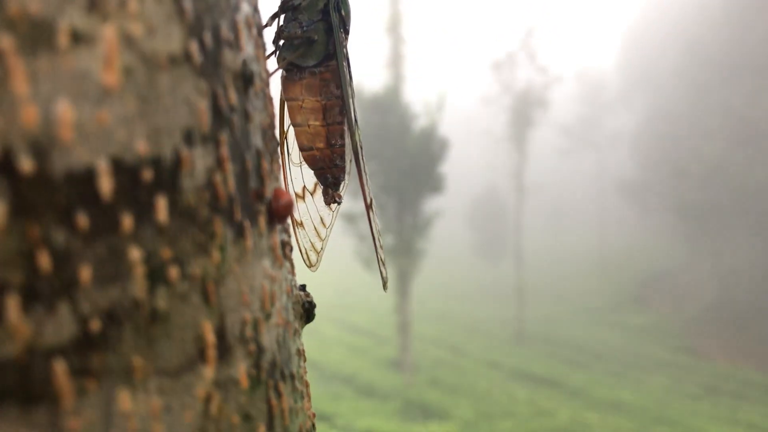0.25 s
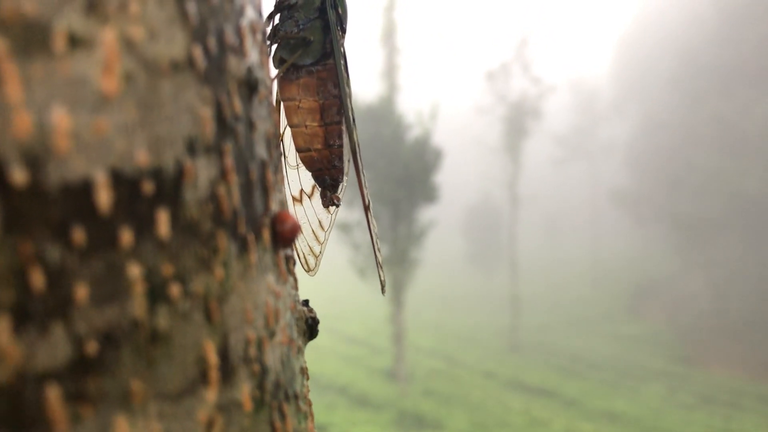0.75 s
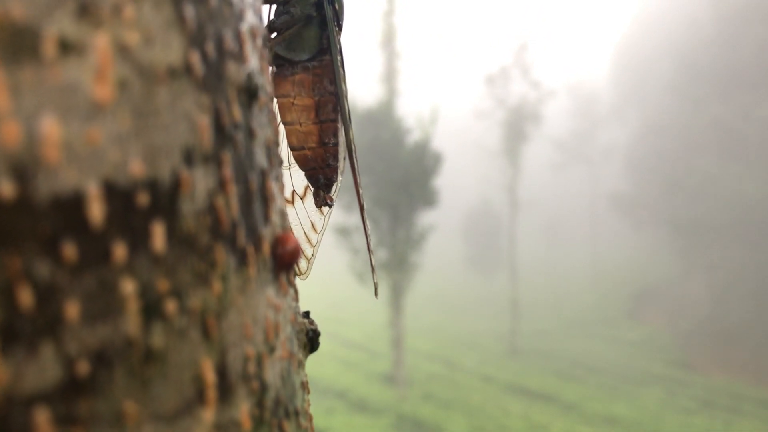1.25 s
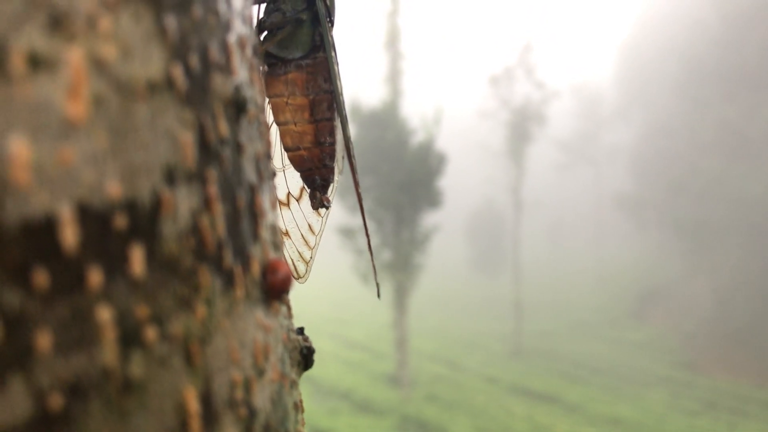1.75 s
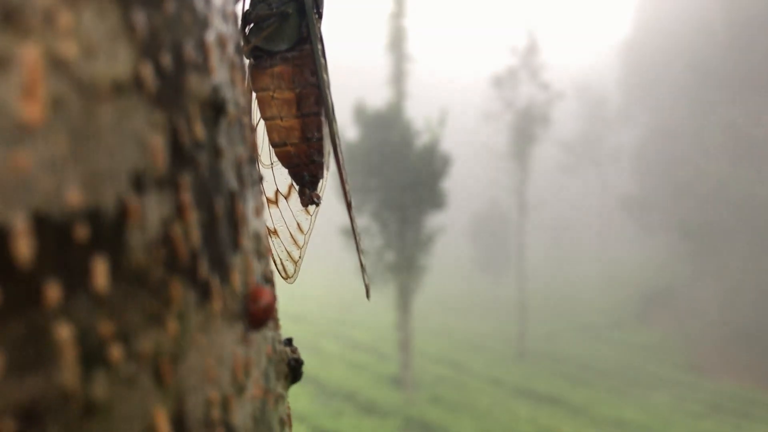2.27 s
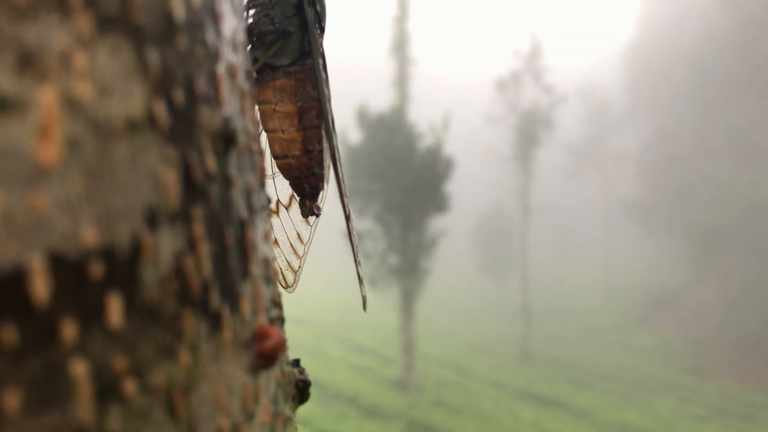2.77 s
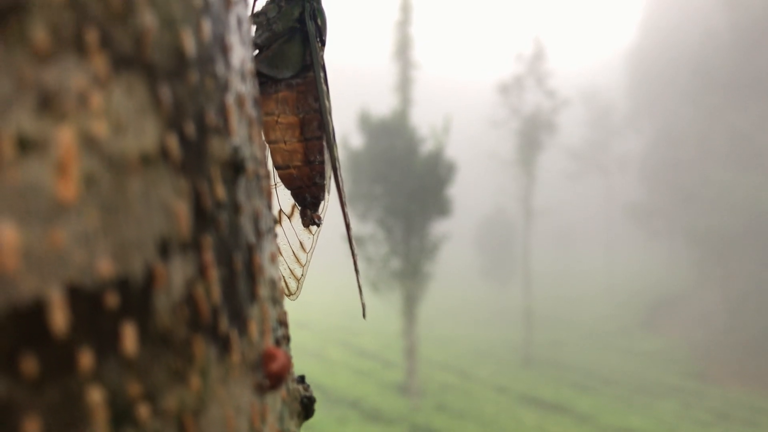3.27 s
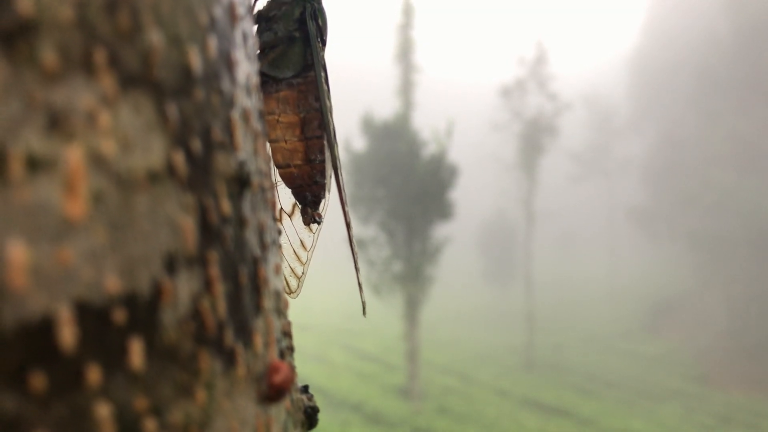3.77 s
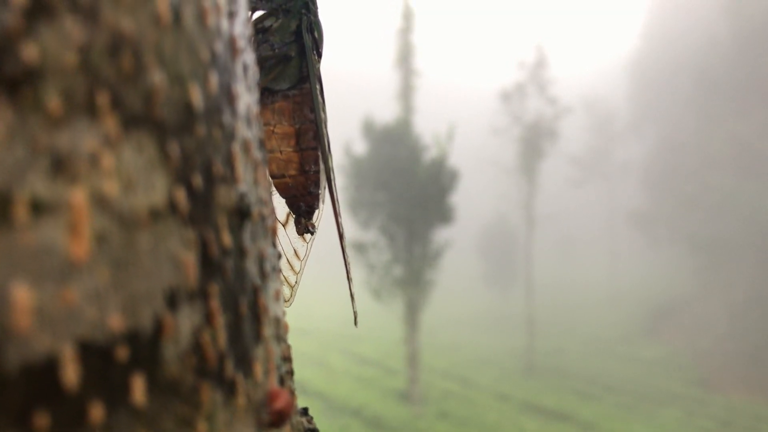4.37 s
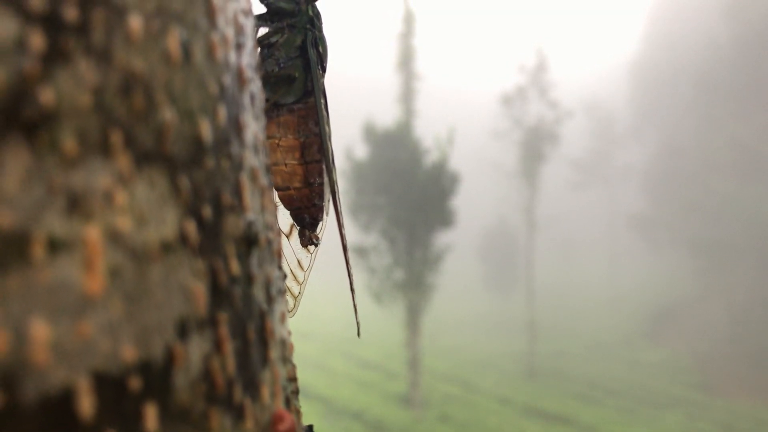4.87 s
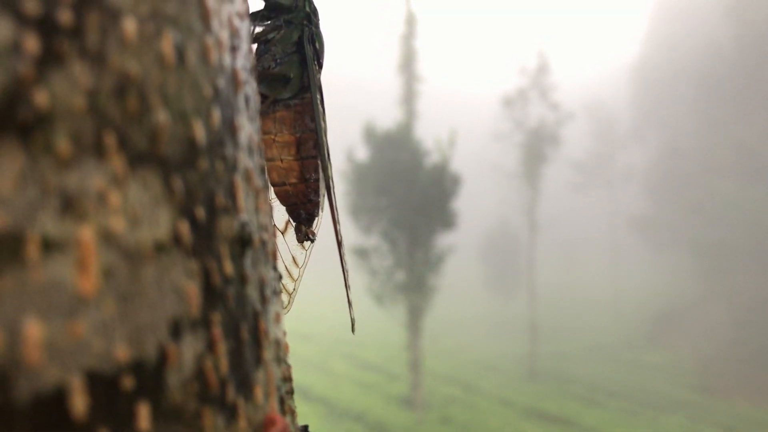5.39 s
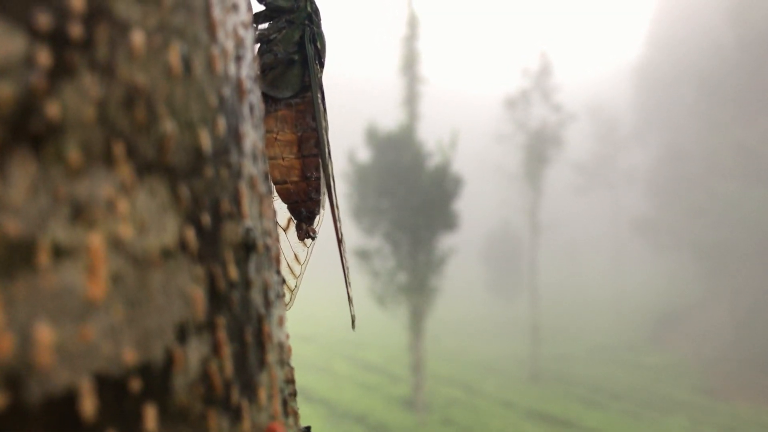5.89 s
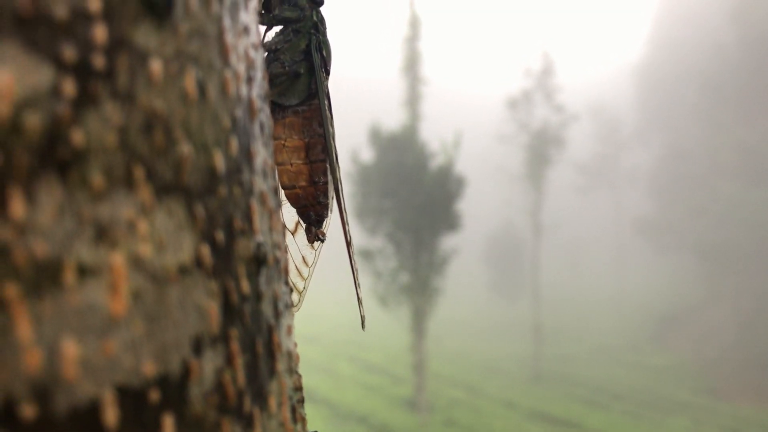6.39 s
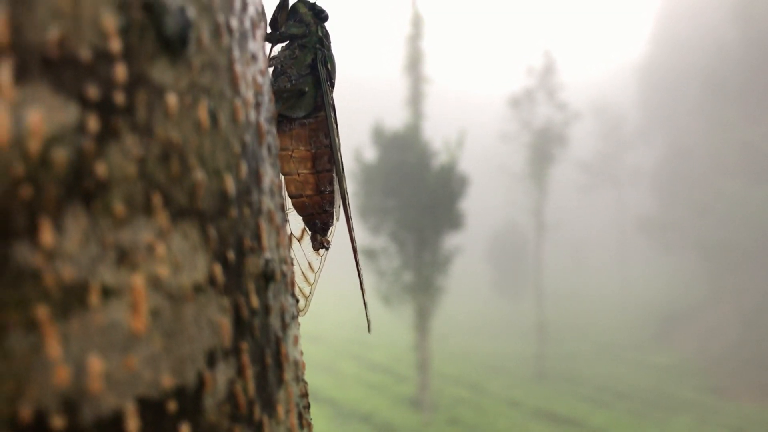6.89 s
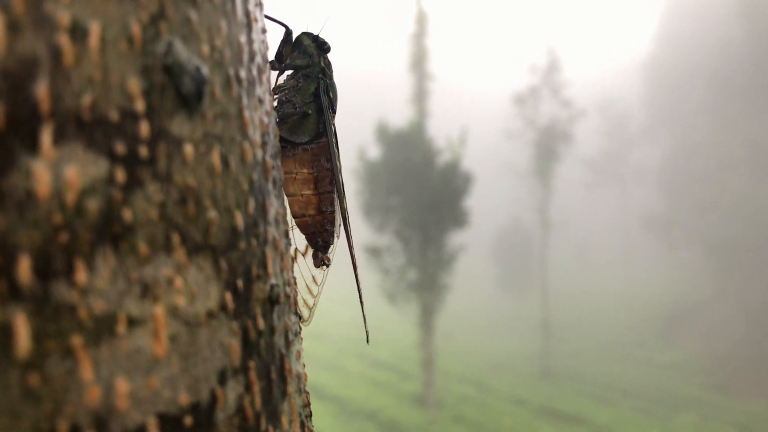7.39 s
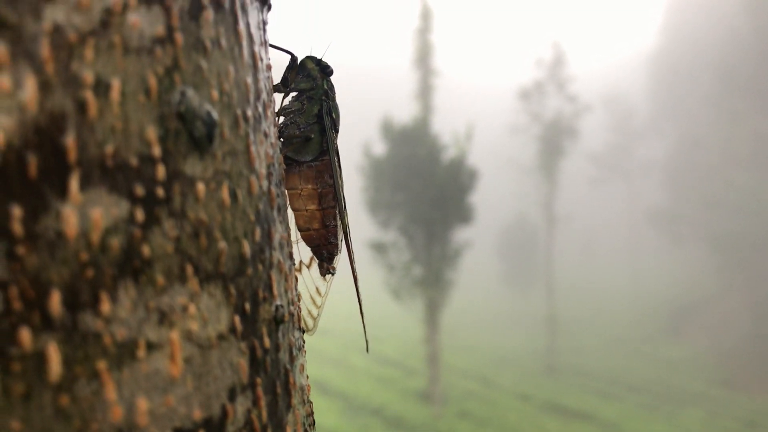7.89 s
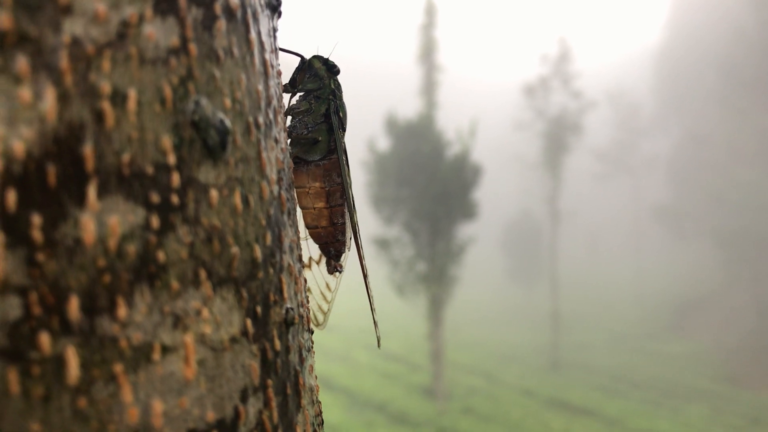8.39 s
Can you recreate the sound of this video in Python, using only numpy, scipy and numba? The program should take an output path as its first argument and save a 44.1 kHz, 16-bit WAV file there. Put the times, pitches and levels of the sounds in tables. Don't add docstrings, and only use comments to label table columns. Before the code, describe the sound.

A single cicada on a trunk sings very close to the microphone on an open misty hillside. Harsh clicking bursts pulse about thirteen times a second, speed up after six seconds, fuse into a clearer ringing whine near seven and a half, then cut off. Sparse ticking pairs restart and thicken. Low wind thumps buffet the microphone; faint insects and bird whistles lie far behind.

```python
import sys
import numpy as np
from scipy import signal
from scipy.io import wavfile
from scipy.ndimage import uniform_filter1d
from numba import njit

SR = 44100
rng = np.random.default_rng(int(sys.argv[2]) if len(sys.argv) > 2 else 0)


def decibels_to_gain(level_db):
    exponent = np.asarray(level_db, float) / 20
    return 10 ** exponent


def wav_out(sig):
    wavfile.write(sys.argv[1], SR, np.round(np.clip(np.atleast_2d(sig).T, -1, 1) * 32767).astype(np.int16))


N = 381465
T_S = np.arange(N) / SR
LOCK_T60_MS = 8.2
LOCK_FROM_S = 7
BURST_GAP_S = .008


def unit(x):
    return x / np.sqrt(np.mean(x ** 2) + 1e-20)


def in_time(rows):
    s, *columns = np.transpose(rows)
    return [np.interp(T_S, s, c) for c in columns]


def filtered(x, order, hz, kind="low"):
    return signal.sosfilt(signal.butter(order, hz, kind, fs=SR, output="sos"), x)


def band(low_hz, high_hz, order=2):
    return unit(filtered(rng.standard_normal(N + SR), order, [low_hz, high_hz], "band")[SR:])


def clicks(seconds, db):
    at = np.round(seconds * SR).astype(int).ravel()
    return np.bincount(at, decibels_to_gain(db).ravel(), N + SR)[:N]


@njit
def resonate(x, feed, r, w):
    out = np.zeros(len(x))
    for i in range(2, len(x)):
        out[i] = feed[i] * x[i - 1] + 2 * r[i] * np.cos(w[i]) * out[i - 1] - r[i] ** 2 * out[i - 2]
    return out


def ring(x, hz, t60_ms):
    w = 2 * np.pi * hz / SR + np.zeros(N)
    r = decibels_to_gain(-60000 / (t60_ms * SR)) + np.zeros(N)
    return resonate(x + 1e-18, np.sin(w), r, w)


def sweep(x, from_hz, to_hz, ms):
    t = np.arange(int(ms * SR / 1000)) / SR
    chirp = np.hanning(len(t)) * signal.chirp(t, from_hz, ms / 1000, to_hz)
    return np.convolve(x, chirp)[:N]


def buckle_times():
    # (start [s], buckles [count], first gap
    # [ms], settled gap [ms], last gap [ms])
    even_song = [(0.0044, 1, 0.0, 0.0, 0.0), (0.0195, 8, 8.5, 4.7, 5.6), (0.093, 10, 8.6, 4.4, 6.9),
                 (0.1673, 11, 8.1, 4.5, 4.2), (0.2479, 12, 7.93, 4.67, 6.1), (0.3277, 6, 9.0, 7.2, 10.3),
                 (0.3787, 9, 10.5, 8.1, 10.4), (0.4732, 6, 8.3, 6.3, 11.8), (0.5388, 8, 8.5, 4.8, 5.7),
                 (0.6136, 9, 8.6, 4.5, 4.6), (0.69, 9, 8.2, 4.5, 3.9), (0.7647, 11, 8.2, 4.5, 4.7),
                 (0.8425, 4, 8.9, 5.1, 8.7), (0.8737, 8, 11.1, 9.2, 10.5), (0.9505, 5, 12.2, 8.7, 9.2),
                 (1.0188, 5, 9.0, 5.1, 6.3), (1.0841, 7, 9.1, 5.9, 7.9), (1.1608, 9, 8.7, 4.7, 8.8),
                 (1.238, 9, 8.6, 4.6, 5.0), (1.3157, 9, 9.0, 4.8, 4.7), (1.3933, 10, 8.1, 6.0, 12.6),
                 (1.478, 4, 9.7, 4.7, 9.1), (1.5105, 5, 11.8, 7.5, 7.3), (1.5756, 6, 8.7, 5.5, 9.6),
                 (1.647, 7, 9.5, 5.0, 4.6), (1.7254, 8, 8.5, 5.2, 6.8), (1.804, 8, 8.9, 5.2, 6.5),
                 (1.8836, 8, 8.9, 6.1, 9.4), (1.9547, 8, 10.4, 8.9, 12.9),
                 (2.0463, 7, 9.2, 6.7, 9.4), (2.1252, 7, 9.1, 4.7, 4.8), (2.1984, 9, 8.8, 4.8, 5.2),
              (2.2789, 8, 8.9, 5.3, 7.8), (2.3567, 8, 8.9, 6.9, 12.9), (2.4414, 7, 9.6, 5.6, 8.6),
              (2.5197, 7, 9.1, 4.8, 4.7), (2.5934, 8, 8.7, 5.4, 9.0), (2.6731, 7, 9.0, 6.1, 7.4),
              (2.7505, 7, 9.4, 6.1, 5.1), (2.829, 4, 9.1, 4.5, 8.3), (2.8594, 4, 11.7, 7.8, 11.3),
              (2.9105, 3, 10.1, 0.0, 6.3), (2.9348, 4, 6.1, 21.0, 9.7), (2.9942, 6, 9.2, 5.8, 11.0),
              (3.0689, 7, 9.1, 6.0, 6.6), (3.1462, 7, 9.1, 5.4, 5.1), (3.2255, 7, 9.2, 5.3, 5.6),
              (3.3041, 7, 9.0, 6.3, 6.7), (3.3848, 4, 9.4, 3.8, 7.9), (3.4145, 4, 10.7, 13.6, 11.7),
              (3.4737, 6, 10.4, 6.2, 9.4), (3.5527, 6, 9.2, 5.7, 8.6), (3.6301, 6, 9.1, 5.7, 8.9),
              (3.7075, 7, 9.3, 6.1, 7.1), (3.7875, 7, 8.2, 5.7, 7.2), (3.8623, 6, 9.0, 6.2, 11.1),
              (3.939, 6, 9.7, 6.2, 10.4),
                 (4.0224, 6, 9.4, 5.5, 8.4), (4.0986, 7, 9.3, 5.0, 4.4), (4.1724, 8, 8.5, 4.8, 5.7),
              (4.2488, 7, 9.1, 5.5, 5.2), (4.3214, 6, 9.0, 10.5, 13.5), (4.3855, 5, 11.4, 12.3, 12.4),
              (4.4654, 5, 9.0, 5.0, 5.9), (4.5373, 7, 8.9, 4.7, 5.3), (4.6119, 8, 8.2, 4.6, 6.0),
              (4.694, 6, 7.7, 5.4, 4.8), (4.77, 6, 9.3, 6.1, 6.9), (4.8255, 1, 0.0, 0.0, 0.0),
              (4.8426, 7, 12.6, 6.9, 12.1), (4.9401, 6, 8.6, 5.5, 10.7), (5.0144, 7, 8.2, 4.7, 6.2),
              (5.0948, 7, 8.4, 5.1, 9.8), (5.1742, 7, 8.6, 6.3, 13.3), (5.2549, 7, 8.9, 5.1, 7.0),
              (5.3336, 7, 7.8, 4.9, 10.1), (5.413, 7, 8.0, 5.6, 9.2), (5.4933, 7, 8.7, 5.4, 8.6),
              (5.5695, 7, 7.5, 4.9, 7.9), (5.6461, 8, 8.7, 5.1, 8.2), (5.7292, 7, 7.8, 4.7, 7.4),
              (5.8017, 8, 7.2, 5.3, 13.5), (5.8668, 5, 9.3, 6.6, 5.9), (5.9042, 4, 7.8, 12.8, 11.3),
              (5.9664, 7, 7.3, 5.2, 8.5)]
    quickening = [(6.0374, 9, 7.1, 4.2, 5.8), (6.1104, 9, 6.6, 4.2, 5.2), (6.1852, 10, 7.9, 4.2, 6.5),
                  (6.2575, 10, 7.6, 4.2, 5.6), (6.3325, 10, 7.2, 4.1, 7.5), (6.4071, 5, 8.0, 5.5, 4.3),
                  (6.4371, 5, 4.1, 7.9, 8.9), (6.4806, 10, 10.3, 4.5, 8.5), (6.5676, 10, 6.4, 4.1, 8.8),
                  (6.6398, 13, 7.54, 4.0, 5.5), (6.7209, 13, 6.29, 3.83, 4.3),
                  (6.7966, 14, 5.69, 3.71, 5.3), (6.8784, 15, 5.37, 3.81, 5.5),
                  (6.9578, 16, 4.82, 3.72, 4.6), (7.0361, 17, 5.0, 3.74, 7.3),
                  (7.1154, 15, 4.54, 3.68, 5.5), (7.1906, 14, 4.54, 3.68, 4.6),
                  (7.2596, 13, 4.37, 3.7, 6.3), (7.3266, 11, 4.4, 3.8, 5.6), (7.3901, 8, 4.6, 3.8, 5.3),
                  (7.4482, 8, 4.7, 3.8, 4.8), (7.505, 8, 4.3, 4.0, 4.2), (7.5627, 35, 4.22, 3.97, 4.0)]
    restart = [(7.7544, 2, 0.0, 0.0, 10.16), (7.785, 2, 0.0, 0.0, 8.62), (7.8109, 4, 10.1, 17.7, 9.8),
               (7.863, 2, 0.0, 0.0, 10.32), (7.8881, 2, 0.0, 0.0, 11.45), (7.9185, 2, 0.0, 0.0, 11.93),
               (7.9475, 6, 12.5, 12.0, 11.0), (8.079, 5, 5.4, 14.0, 12.0), (8.1958, 4, 10.6, 17.4, 11.6),
               (8.3052, 2, 0.0, 0.0, 12.27), (8.38, 4, 9.7, 12.8, 11.9), (8.4711, 4, 10.3, 13.3, 11.1),
               (8.5517, 6, 7.0, 4.2, 5.7), (8.6374, 3, 5.6, 0.0, 5.4)]
    # (time [s], limp [ms])
    gait = [(0, .6), (.8, .8), (1.1, 1), (3, 1.5), (4.5, 1.2), (4.75, .2), (6, .2), (6.6, .3), (6.82, .3),
            (6.9, -.45), (7.2, -.45), (7.5, -.3), (7.56, .19), (7.7, .19), (7.75, .3)]
    gait_s, limp_ms = np.transpose(gait)
    times = []
    for start, count, first, settled, last in [*even_song, *quickening, *restart]:
        k = np.arange(int(count) - 1)
        gaps_ms = settled + (first - settled) * .5 ** k
        gaps_ms += np.interp(start, gait_s, limp_ms) * (-1.) ** k * (k > 0)
        gaps_ms[-1:] = last
        times.append(start + np.r_[0, np.cumsum(gaps_ms)] / 1000)
    return np.concatenate(times)


def lock_to_abdomen(at, belly_hz, belly_ms):
    cycles = np.cumsum(belly_hz) / SR
    locked = (np.interp(at, T_S, belly_ms) > LOCK_T60_MS) & (at > LOCK_FROM_S)
    free = np.interp(at, T_S, cycles)
    beat = free.copy()
    for k in np.flatnonzero(locked[1:] & (np.diff(at) < BURST_GAP_S)) + 1:
        beat[k] = beat[k - 1] + np.round(free[k] - beat[k - 1])
    return np.interp(beat, cycles, T_S), locked


def crowding(at, swell):
    hurry_ms, rush_ms, swell_eases = 5.5, 4.4, 0.55
    gap_ms = 1000 * (at - np.r_[-1, -1, -1, at[:-3]]) / 3
    hurry = np.interp(T_S, at, np.clip((hurry_ms - gap_ms) / (hurry_ms - rush_ms), 0, 1))
    return hurry * (1 - np.clip(swell_eases * swell, 0, 1))


def weak_side(at, locked):
    uneven_from_s, uneven_to_s, uneven_share = 6.95, 7.72, .6
    nth = np.arange(len(at))
    nth = nth - np.maximum.accumulate(nth * (np.diff(at, prepend=-1) > BURST_GAP_S))
    uneven = ~locked & (at > uneven_from_s) & (at < uneven_to_s)
    return (locked * (nth % 2) + uneven_share * uneven * (1 - nth % 2))[:, None]


def abdomen(push, both, belly_hz, belly_ms, swell, hurry, ringing, since_ms):
    snap_hz, snap_ms = 996, 0.55
    sag_hz = snap_hz * np.exp(-since_ms / snap_ms) * np.clip(3 - 2 * belly_ms / LOCK_T60_MS, 0, 1)
    out = decibels_to_gain(-1.5 * ringing) * ring(both, belly_hz + sag_hz, belly_ms + 2.2 * hurry)
    sac_db = -34.5 + 40 * np.minimum(swell + 0.41 * hurry, 1)
    out -= decibels_to_gain(sac_db) * ring(push, 1563, 7.9)
    wing_db = -2.5 + 12 * hurry
    out -= decibels_to_gain(wing_db) * ring(both, belly_hz + 655, 6)
    flank_db = -13
    return out + decibels_to_gain(flank_db) * ringing * ring(push, belly_hz, 2.9)


def tymbal(push, belly_hz, swell, flare, hurry, since_ms):
    snap_hz, snap_ms, t60_ms = 900, 1, 2.45
    lift_hz = belly_hz - 2214
    hz = 4140 + 0.052 * lift_hz - 300 * flare - 300 * hurry + snap_hz * np.exp(-since_ms / snap_ms)
    db = -1 - 5 * swell + 13 * lift_hz / 1000 + 2.5 * flare - 4.5 * hurry
    return decibels_to_gain(db) * ring(push, hz, t60_ms)


def strained_ribs(start, strength, chance, flare, slump):
    sweep_db, catch_ms, catch_db, slump_db = 11, .45, -3, -11.5
    catch_s = start + catch_ms / 1000 * (1 + .15 * np.abs(chance[:, 1:2]))
    catch = clicks(catch_s, strength + sweep_db + catch_db + .8 * chance[:, 2:3])
    out = sweep(flare * (clicks(start, strength + sweep_db) + catch), 2620, 6730, 3.4)
    return out + sweep(slump * clicks(start, strength + slump_db), 5000, 1660, 1.8)


def shell(crack, rattle, swell, flare, ringing):
    # (frequency [Hz], buckling level [dB], spring-back level [dB], t60 [ms], finale change [dB])
    shell_modes = [
        (4950, -11.5, -4, 2.3, 2.5),
        (5900, -10.5, -12.5, 4.1, 10),
        (7273, -15, -7.5, 3.95, 0.5),
        (8430, -45, -22.5, 5.4, -6),
        (9930, -26, -16, 2.9, 11.5),
        (11080, -12.5, -10.5, 2.9, -18),
        (13020, -6, -12.5, 1.02, -7),
        (14300, -9, -29, 2.7, 2),
        (15400, -7, -28, 3.3, -2),
    ]
    shell_db = -4 * swell + 1.5 * flare
    out = np.zeros(N)
    for k, (hz, in_db, out_db, t60_ms, finale_db) in enumerate(shell_modes):
        level_db = shell_db + finale_db * np.maximum(ringing, flare)
        out += (-1) ** k * decibels_to_gain(level_db) * ring(decibels_to_gain(in_db) * crack + decibels_to_gain(out_db) * rattle, hz, t60_ms)
    return out


def cicada():
    # (time [s], effort [dB], abdomen [Hz], abdomen t60 [ms], air-sac swelling [0-1])
    posture = [(0, -14, 2400, 7.4, 0.69), (1, -14, 2350, 7.95, 0.64), (2.5, -14.5, 2306, 7.4, 0.58),
               (4, -15, 2304, 7.3, 0.66), (6, -15.5, 2287, 6.4, 0.66), (6.5, -15, 2296, 4.8, 0.71),
               (6.85, -15, 2340, 4, 0.74), (7.05, -13.5, 2430, 5.4, 0.92), (7.25, -13, 2434, 7.1, 0.92),
               (7.38, -13, 2490, 8.8, 0.77), (7.46, -14.5, 2598, 13.2, 0.84), (7.56, -14, 2640, 13, 0.66),
               (7.63, -19, 2667, 14, 0.66), (7.71, -20, 2716, 6.5, 0.57), (7.74, -24, 2330, 6.1, 0.43),
               (8.02, -21, 2330, 6.5, 0.5), (8.2, -16.5, 2346, 6.2, 0.76), (8.65, -16, 2352, 7.6, 0.7)]
    # (time [s], share [0-1])
    strain = [
        (0, 0.094),
        (7.5, 0.057),
        (7.632, 0.13),
        (7.652, 0.91),
        (7.71, 0.74),
        (7.735, 0.027),
        (9, 0.047),
    ]
    # (push on abdomen [dB], push on tymbal [dB], crack on shell [dB])
    ribs = np.array([
        (-5, -1, 4),
        (2.5, 8.5, 6),
        (0.8, 11, -1),
        (-4, 7.5, -5),
        (-13, 1.5, -2),
    ])
    # (delay after first rib [ms], abdomen [dB], shell [dB])
    back = np.array([
        (2.448, -7, 3),
        (2.898, -14, -8),
        (3.302, -16, 2.5),
    ])
    effort_db, belly_hz, belly_ms, swell = in_time(posture)
    flare, = in_time(strain)
    at, locked = lock_to_abdomen(buckle_times(), belly_hz, belly_ms)
    hurry = crowding(at, swell)
    weak = weak_side(at, locked)
    since_ms = 1000 * np.abs(T_S - at[np.maximum(np.searchsorted(at, T_S) - 1, 0)])
    ringing = np.clip(belly_ms / LOCK_T60_MS - 1, 0, 1) * (T_S > LOCK_FROM_S)

    start, in_lock = at[:, None], locked[:, None]
    here = np.minimum(start * SR, N - 1).astype(int)
    chance = rng.standard_normal((len(start), 18))
    luck = chance * np.minimum(7 / belly_ms[here], 1) ** 2
    strength = effort_db[here] + 0.23 * luck[:, :1] - 3.5 * weak

    rib = np.arange(len(ribs))
    haste, slowing = 0.13, 0.037
    rib_periods = rib + slowing * rib ** 2 - haste * rib
    rib_s = start + rib_periods / belly_hz[here] + 8e-6 * luck[:, 1:6]
    rib_db = strength + 1.55 * luck[:, 6:11]
    back_s = start + (back[:, 0] + 0.12 * luck[:, 11:12] + 0.03 * luck[:, 12:15]) / 1000
    back_db = strength + 2.5 * luck[:, 15:18]

    push_s = np.where(in_lock, start + rib / belly_hz[here], rib_s)
    in_step_s = start + np.round((back_s - start) * belly_hz[here] - .5) / belly_hz[here]
    release_s = np.where(in_lock, in_step_s, back_s)
    push = clicks(push_s, rib_db + ribs[:, 0])
    both = push + clicks(release_s, back_db + back[:, 1] + 3 * in_lock)
    plate_lag_ms = .35
    plate_push = clicks(rib_s + plate_lag_ms / 1000, rib_db + ribs[:, 1])
    crack = clicks(rib_s, rib_db + ribs[:, 2])
    rattle = clicks(back_s, back_db + back[:, 2])

    out = abdomen(push, both, belly_hz, belly_ms, swell, hurry, ringing, since_ms)
    out -= tymbal(plate_push, belly_hz, swell, flare, hurry, since_ms)
    out += strained_ribs(start, strength, chance, flare, hurry * (belly_ms < LOCK_T60_MS))
    out += shell(crack, rattle, swell, flare, ringing)
    notch_hz, notch_width_hz, notch_depth = 10400, 800, .7
    out -= notch_depth * signal.lfilter(*signal.iirpeak(notch_hz, notch_hz / notch_width_hz, fs=SR), out)
    return filtered(out, 6, 1060, "high")


def hillside(x):
    scatter_db, t60_s, first_return_s = -41, 0.0041, .004
    t = np.arange(SR // 5) / SR
    tail = rng.standard_normal(len(t)) * decibels_to_gain(-60 * t / t60_s) * (t > first_return_s)
    tail = signal.lfilter([1], [1, -.5], tail)
    return decibels_to_gain(scatter_db) * signal.fftconvolve(x, tail / np.sqrt(np.sum(tail ** 2)))[:N]


def slaps():
    # (time [s], peak [dB], frequency [Hz])
    slap_events = [
        (1.612, -26, 190),
        (2.307, -13, 110),
        (3.269, -14, 166),
        (4.023, -19, 110),
        (6.453, -16, 163),
        (7.4, -13.5, 154),
        (8.503, -2, 119),
    ]
    rise_ms, slap_db, cut_hz = 6.1, -8, 450
    out, t = np.zeros(N), np.arange(SR // 8) / SR
    swing = 1000 * t / rise_ms * np.exp(1 - 1000 * t / rise_ms)
    for s, db, hz in slap_events:
        out[int(s * SR):][:len(t)] += decibels_to_gain(db + slap_db) * swing * np.sin(2 * np.pi * hz * t)
    return filtered(out, 2, cut_hz)


def far_insects():
    # (centre [Hz], width [Hz], level [dB])
    chorus = [
        (2590, 760, -56),
        (4300, 460, -55.5),
        (3180, 6300, -55),
        (12200, 510, -79),
    ]
    # (time [s], level [dB])
    whistler = [
        (8.0, -65),
        (8.16, -43),
        (8.3, -39.5),
        (8.6, -50),
    ]
    whistle_hz = 5520
    out = sum(decibels_to_gain(db) * band(hz - width / 2, hz + width / 2) for hz, width, db in chorus)
    silent_before, silent_after = (whistler[0][0] - .03, -90), (whistler[-1][0] + .03, -90)
    level_db, = in_time([silent_before, *whistler, silent_after])
    octave = band(2 * whistle_hz - 120, 2 * whistle_hz + 120)
    whistle = band(whistle_hz - 35, whistle_hz + 35) + decibels_to_gain(-32) * octave
    return out + decibels_to_gain(level_db - 5.5) * whistle


def far_notes():
    # (time [s], frequency [Hz], level [dB])
    soft_notes = [
        (3.59, 1870, -52),
        (3.9, 2520, -46),
        (4.2, 2780, -38),
        (4.29, 1440, -46),
        (4.5, 1550, -55),
        (4.65, 1440, -48),
        (8.14, 2700, -49),
        (8.25, 2700, -48),
        (8.33, 2700, -43),
        (8.421, 2700, -45),
    ]
    note_s = 0.06
    out, t = np.zeros(N), np.arange(int(note_s * SR)) / SR
    for s, hz, db in soft_notes:
        out[int(s * SR):][:len(t)] += decibels_to_gain(db) * np.hanning(len(t)) * np.sin(2 * np.pi * hz * t)
    return out


def wind():
    # (peak [s], width [s], rumble [dB], edge [dB])
    gusts = [(0.452, 0.21, -52, -71), (0.801, 0.5, -38.5, -50), (1.26, 0.16, -37.5, -57),
             (1.57, 0.19, -32, -61), (1.622, 0.0099, -38, -18), (1.72, 0.039, -38, -64),
             (1.92, 0.055, -26, -48), (1.99, 0.055, -29, -33.5), (2.316, 0.029, -20, -27.5),
             (2.74, 0.077, -31.5, -45), (3.13, 0.023, -29, -58), (3.287, 0.058, -25, -22.5),
             (3.86, 0.043, -32, -45), (3.94, 0.071, -31, -46), (4.038, 0.018, -13.5, -28),
             (4.29, 0.081, -33, -64), (4.41, 0.086, -30.5, -54), (4.97, 0.047, -32, -58),
             (5.379, 0.03, -27, -65), (6.12, 0.034, -31, -39), (6.215, 0.052, -26.5, -69),
             (6.469, 0.047, -18.5, -24), (6.8, 0.093, -31.5, -48), (6.952, 0.13, -31, -70),
             (7.16, 0.017, -29, -75), (7.408, 0.039, -20, -17), (7.933, 0.078, -35, -33.5),
             (8.265, 0.027, -32.5, -28), (8.4, 0.03, -30, -51), (8.523, 0.054, -28, -17)]
    calm_rumble_db, calm_edge_db, lumps_db, spit_db, hiss_db = -39.5, -57.5, 5, -1, -86
    t = np.arange(0, N + 50, 50) / SR
    s, width_s, rumble_db, edge_db = np.transpose(gusts)
    bell = np.exp(-2.8 * ((t[:, None] - s) / width_s) ** 2)
    rumble_curve = decibels_to_gain(calm_rumble_db) + bell @ decibels_to_gain(rumble_db)
    edge_curve = decibels_to_gain(calm_edge_db) + bell @ decibels_to_gain(edge_db)
    rumble, edge = in_time(np.c_[t, rumble_curve, edge_curve])
    lumps = decibels_to_gain(lumps_db * band(9.6, 36.7))
    gust = filtered(band(119, 260, order=1) * lumps, 3, 235)
    out = rumble * band(33.6, 97, order=3) * decibels_to_gain(2.0 * band(2.1, 14.4))
    out += edge * unit(gust)
    out += decibels_to_gain(spit_db) * edge ** 2 * unit(lumps * band(260, 530))
    return out + decibels_to_gain(hiss_db) * band(810, 8500)


def gain_control(song):
    above_db, share, window = -19.5, 1.64, int(0.43 * SR)
    loud_db = 10 * np.log10(uniform_filter1d(song ** 2, window, origin=window // 3) + 1e-9)
    return decibels_to_gain(-share * np.maximum(loud_db - above_db, 0))


def scene():
    song = cicada()
    background = far_insects() + far_notes() + wind()
    return (song + hillside(song) + slaps() + gain_control(song) * background)[None]


def top_cut(x):
    return signal.sosfilt(signal.butter(12, 17150, fs=SR, output="sos"), x)


def record(dry):
    overload, air_hz, air_db = 3, 15850, -8
    rounded = overload * np.tanh(dry / overload)
    top = signal.sosfilt(signal.cheby2(10, 60, 17300, fs=SR, output="sos"), rounded)
    low = signal.sosfiltfilt(signal.cheby1(6, .5, air_hz, fs=SR, output="sos"), top)
    return top_cut(low + decibels_to_gain(air_db) * (top - low))


dry = scene()
out = record(dry)
wav_out(out)
```